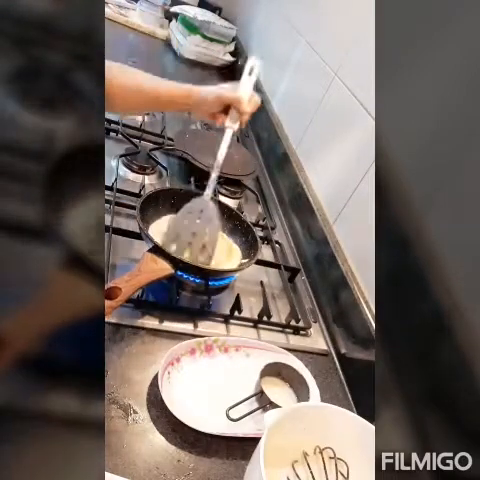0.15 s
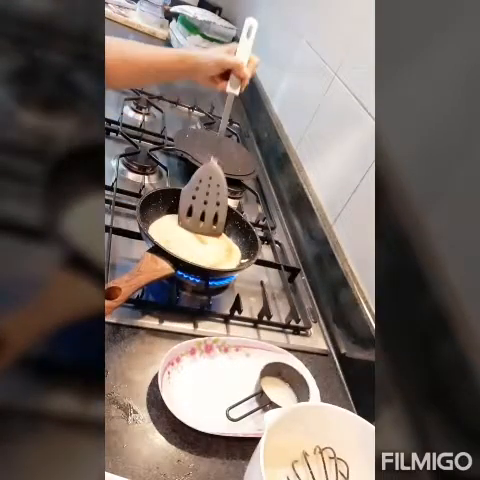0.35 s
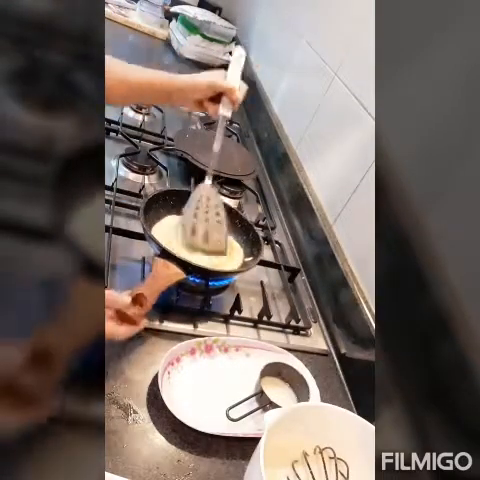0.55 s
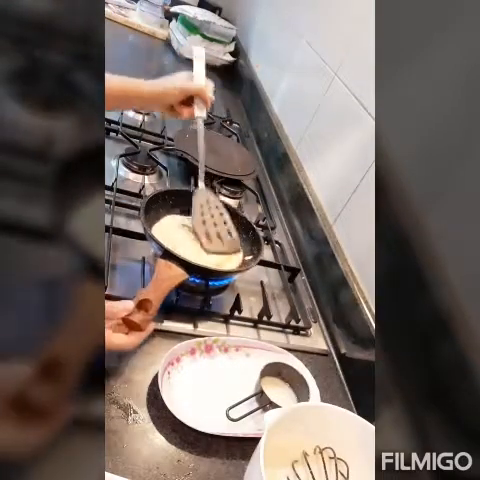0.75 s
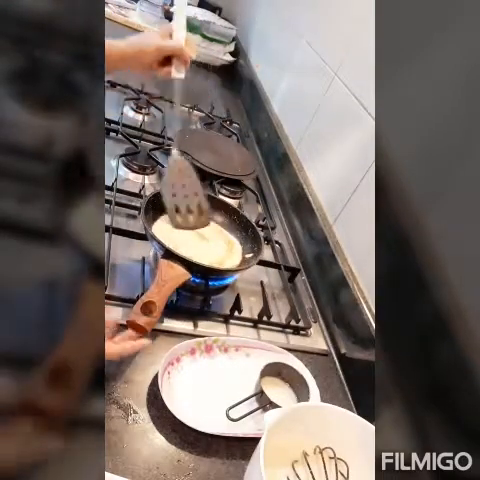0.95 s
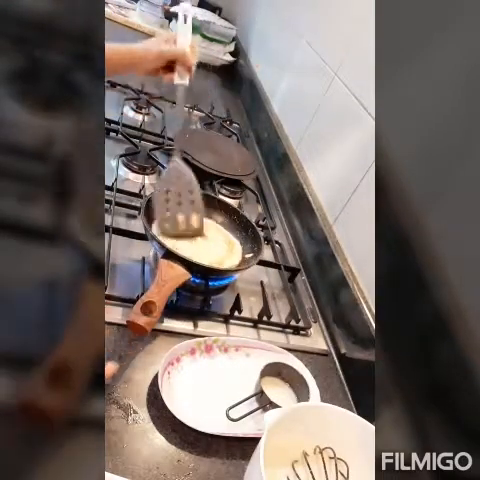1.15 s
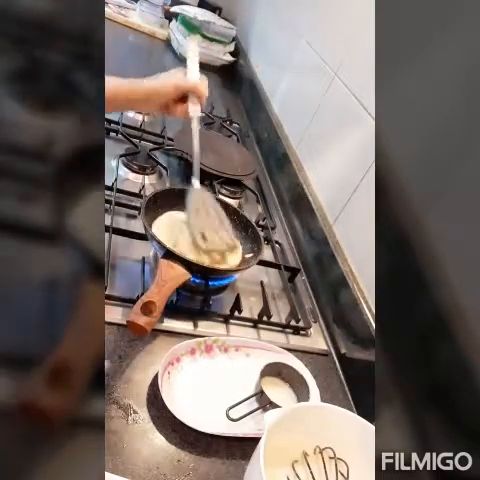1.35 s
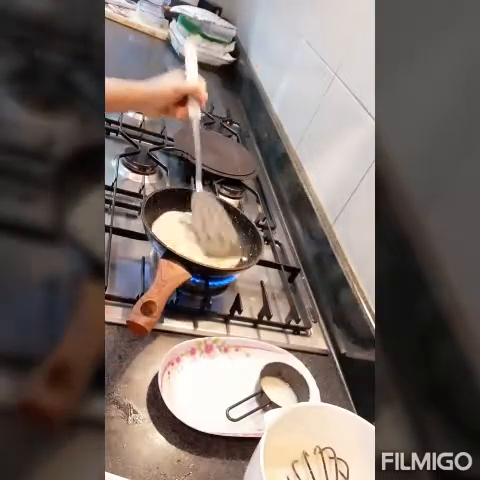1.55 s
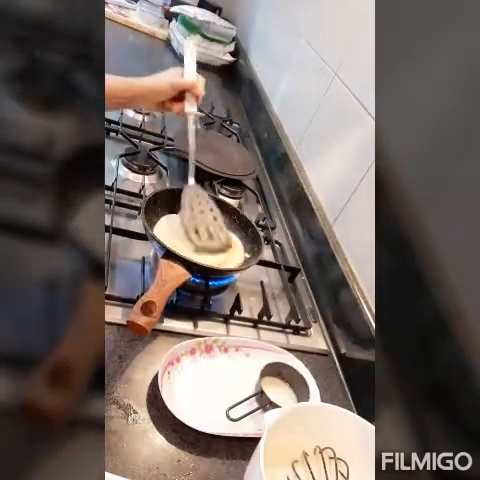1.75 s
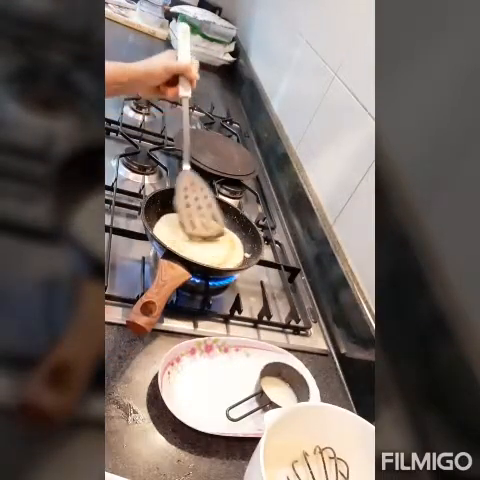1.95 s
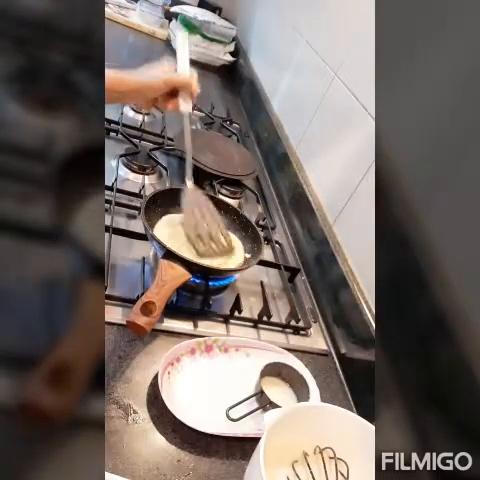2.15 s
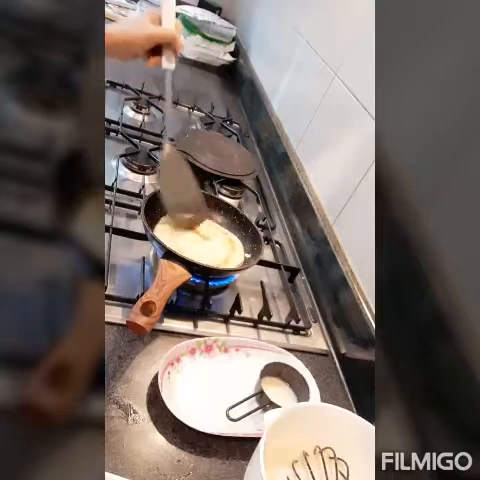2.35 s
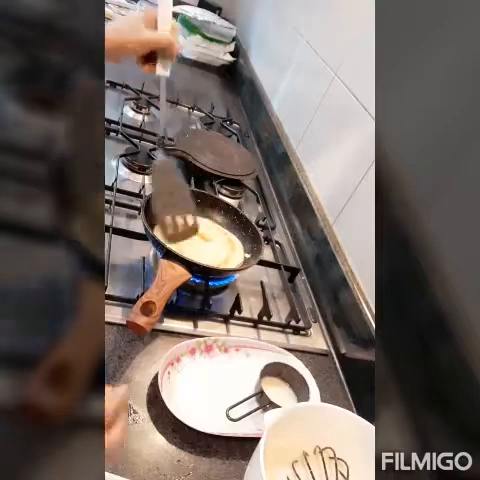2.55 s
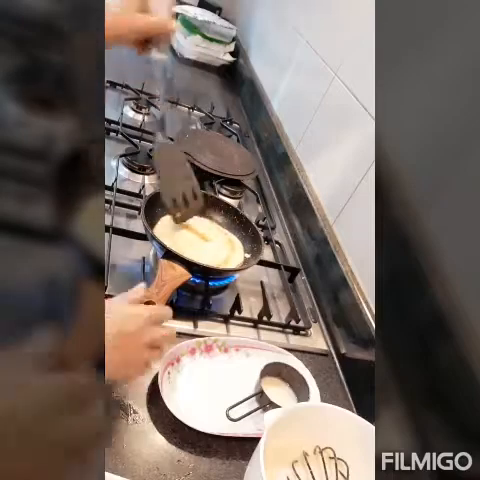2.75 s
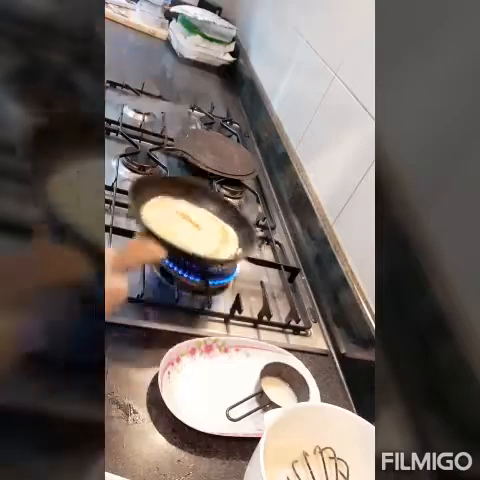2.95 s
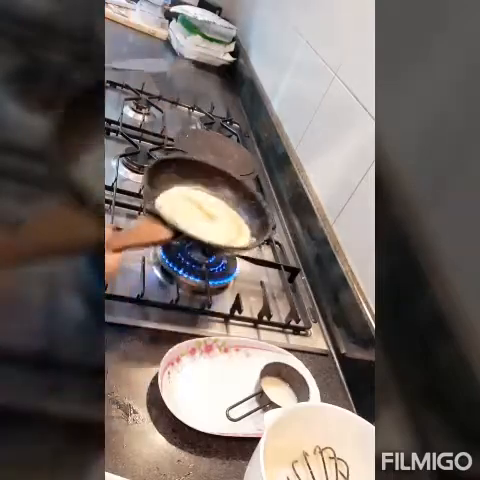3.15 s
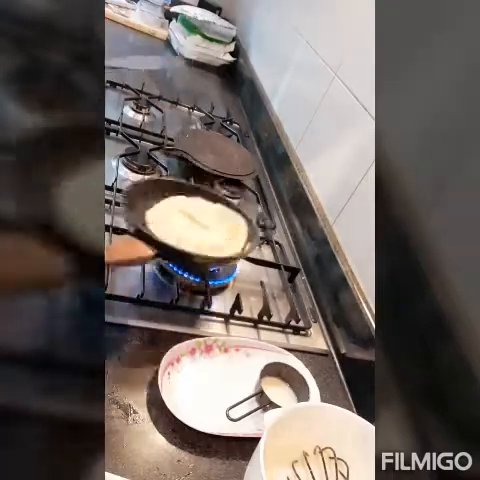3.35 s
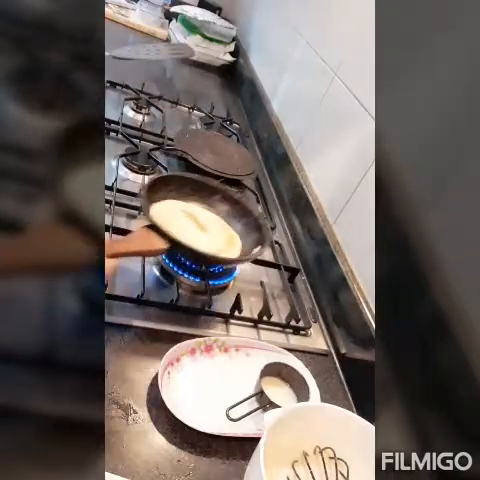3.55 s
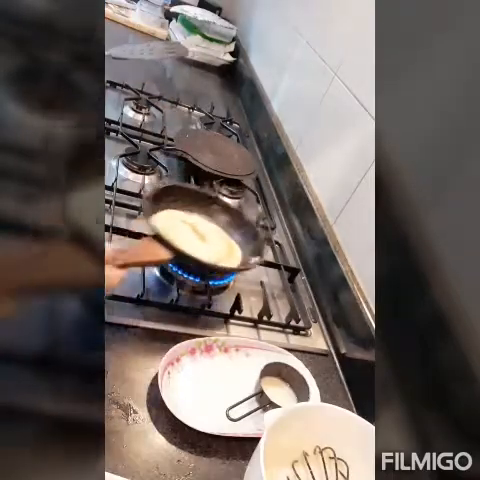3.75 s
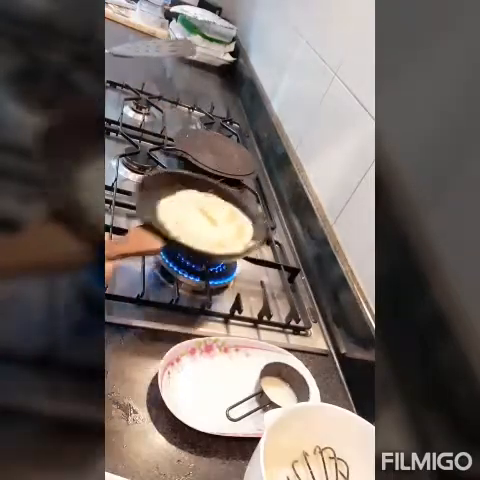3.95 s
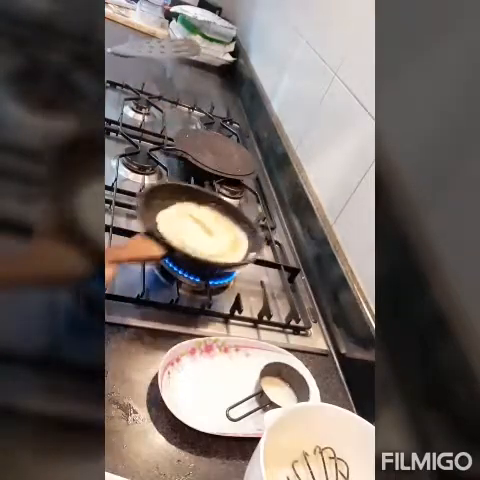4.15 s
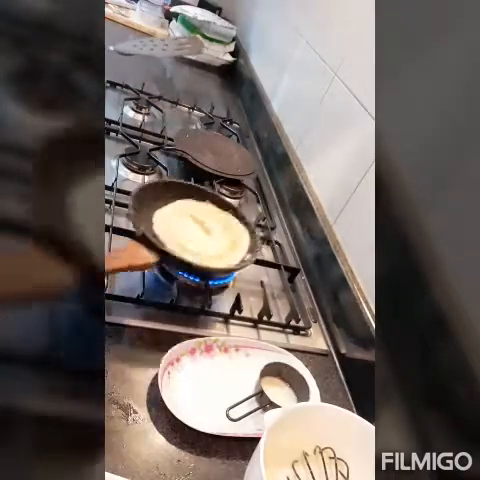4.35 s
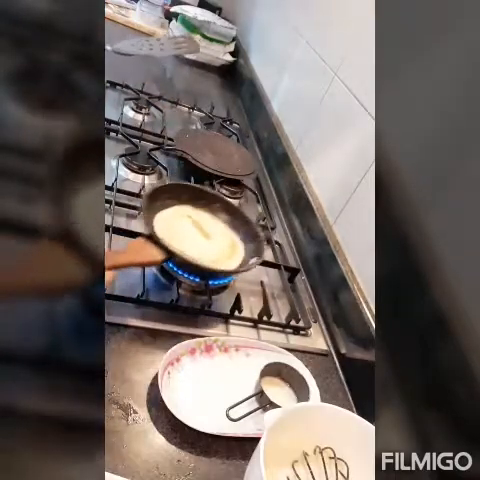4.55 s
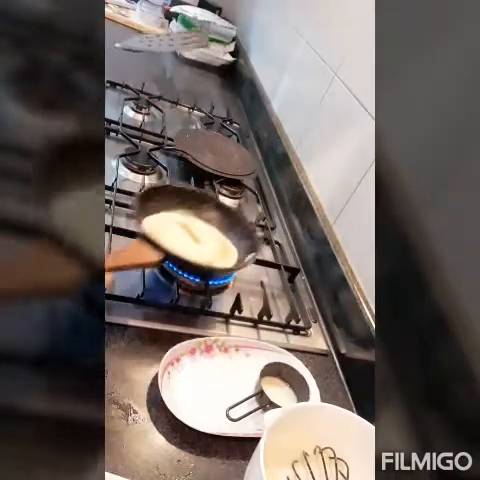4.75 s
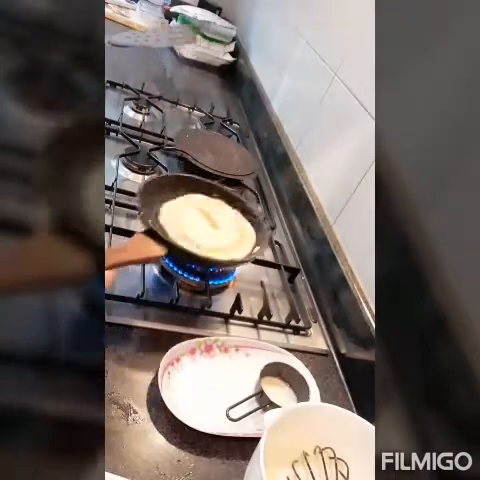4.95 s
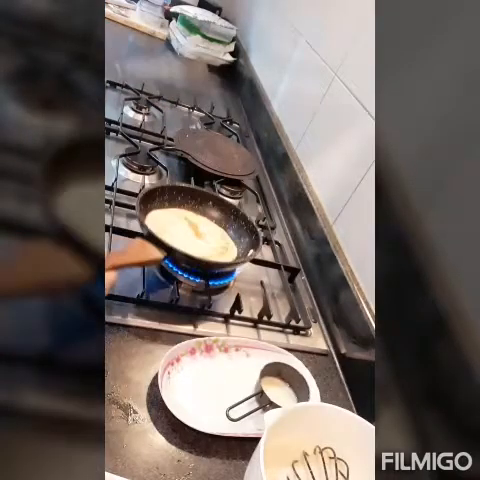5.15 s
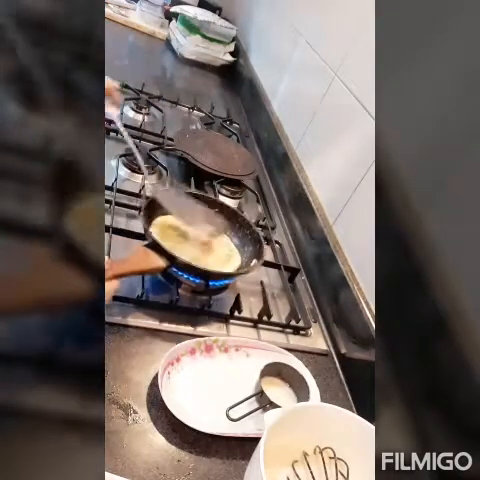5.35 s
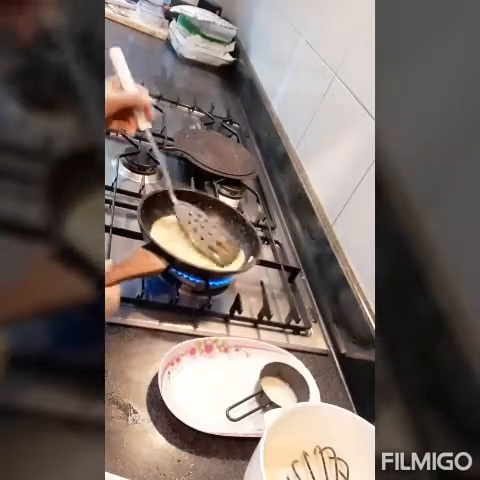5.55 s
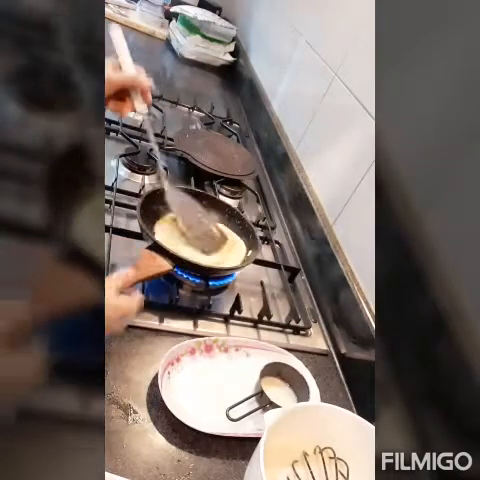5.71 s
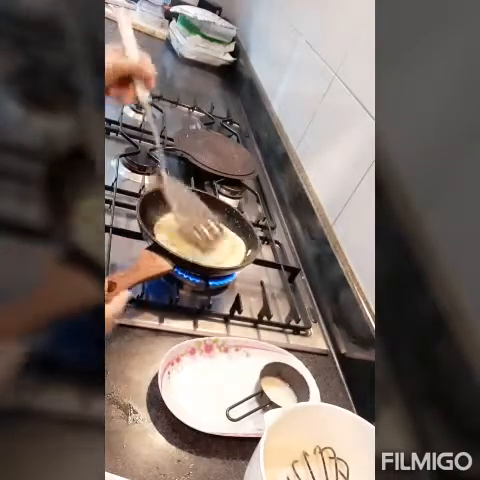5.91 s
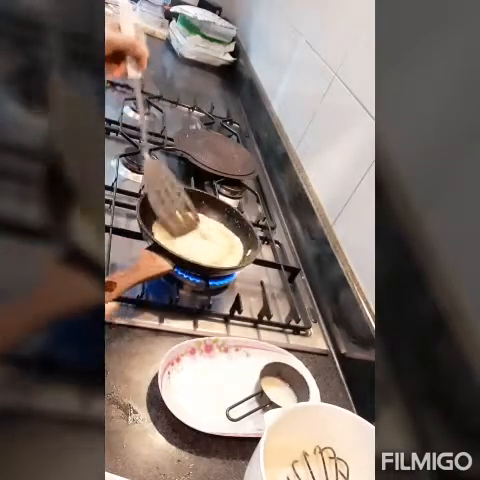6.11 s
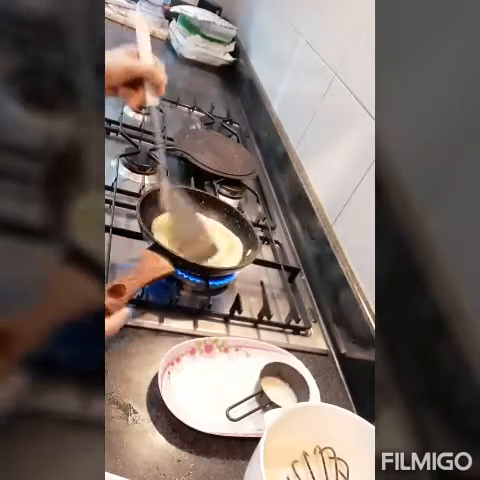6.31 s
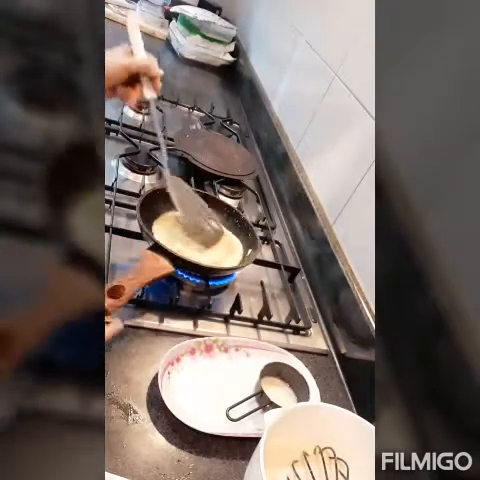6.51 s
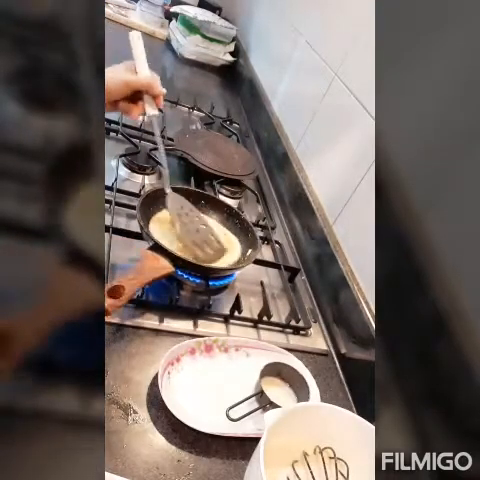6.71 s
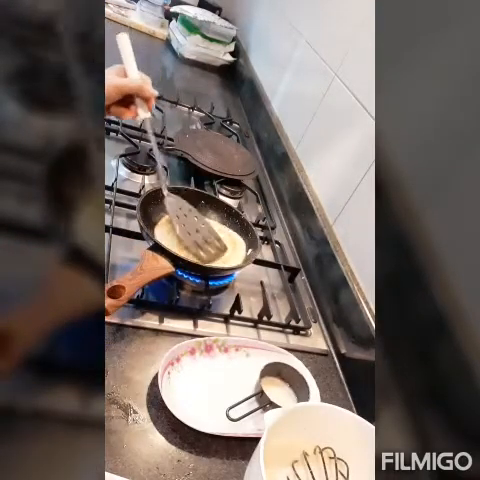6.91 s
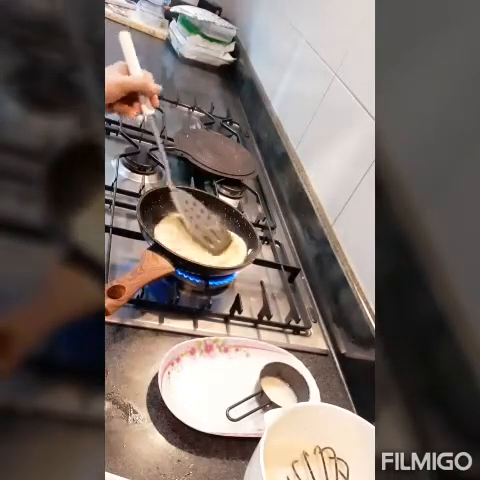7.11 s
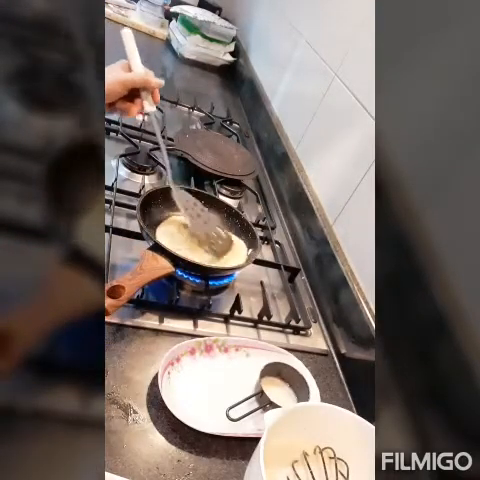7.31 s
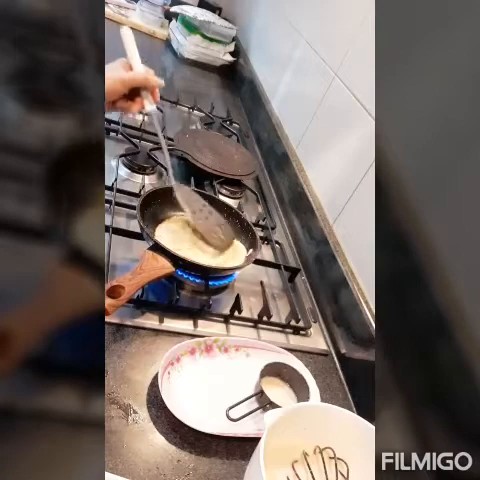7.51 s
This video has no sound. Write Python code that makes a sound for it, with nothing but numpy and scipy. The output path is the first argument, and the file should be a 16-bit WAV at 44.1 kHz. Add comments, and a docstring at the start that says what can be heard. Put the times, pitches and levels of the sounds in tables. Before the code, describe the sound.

Pan knocks and spatula clatters come in sparse bursts above a low electrical hum, soft gas flame and quiet frying hiss in a small kitchen.

```python
"""Pan and spatula, in short damped modes and noise bursts: a pan knocks and slides on an iron gas-hob
grate, and a spatula strikes, taps and scrapes, by random stick-slip, under a frying pancake.
Metal pings, bright clicks and a slowing judder join in. A small tiled kitchen adds one echo and a tail.
Behind: a sizzle of filtered noise and bubble pops, a fluttering burner rumble and a sine hum."""
import sys
import numpy as np
from scipy import signal
from scipy.fft import rfft, irfft, next_fast_len
from scipy.io import wavfile
from scipy.ndimage import uniform_filter1d

SR = 44100
rng = np.random.default_rng(int(sys.argv[2]) if len(sys.argv) > 2 else 0)


def master(y):
    """Save y as 16-bit WAV."""
    cut = np.clip(np.atleast_2d(y).T, -1, 1)
    pcm = np.round(cut * 32767)  # scale
    wavfile.write(sys.argv[1], SR, pcm.astype(np.int16))


N = 333837
TIME = np.arange(N) / SR
RING_TIME = TIME[:SR // 2]

# Event levels are source levels, ahead of the mix in scene(); mode and spectrum levels are relative.
# Pan drops on the grate: start_s, grate_thud_db, pan_clang_db, hob_boom_db, shove_hz, shove_t60_s
KNOCKS = [(.290, -35.5, -50, -53, 353, 0.0065), (0.3984, -21.5, -28.5, -26, 394, 0.009),
          (.4365, -39, -46, -55, 306, 0.0081), (.4825, -40, -53, -52, 383, 0.005),
          (.648, -41, -72, -54, 424, 0.0074), (2.8483, -20, -25.5, -38, 390, 0.006),
          (2.8975, -37, -38, -37, 396, 0.0086), (2.9375, -37, -44, -50, 430, 0.017),
          (3.444, -43.5, -77, -54, 335, 0.027)]
# Spatula blade strikes the pan: start_s, grate_thud_db, pan_clang_db, hob_boom_db, shove_hz, shove_t60_s
STRIKES = [(.7140, -30, -30.5, -34, 363, 0.0055), (1.124, -50, -57, -51, 320, 0.021),
           (1.379, -48, -63, -54, 390, 0.0041), (1.911, -33, -46.5, -64, 386, 0.0093),
           (2.015, -44, -55, -65, 386, 0.0093), (2.115, -42.5, -54, -55, 390, 0.0068),
           (5.2127, -35.5, -47, -31, 414, 0.011), (5.3368, -27.5, -25, -23.5, 345, 0.02),
           (6.472, -55, -46, -36, 390, .0075), (7.518, -39.5, -61, -44, 368, 0.012)]
# Blade tip clicks on the pan: start_s, tick_db, clang_db
TAPS = [(0.2407, -42, -42), (0.2802, -48, -43), (0.3118, -49, -43.5), (0.375, -51, -51), (0.4192, -50, -36),
        (0.4742, -49, -45.5), (0.5074, -70, -43.5), (2.7993, -51, -43), (5.2671, -67, -38.5),
        (5.309, -58, -41.5), (5.6357, -54, -53), (6.445, -66, -52.5), (7.4662, -58, -56)]
# Very short bright clicks, some on top of other blows: start_s, level_db
CLICKS = [(0.4743, -41), (1.8712, -51.5), (2.109, -50), (2.848, -42), (4.4587, -49), (5.3375, -36),
          (5.636, -40.5), (5.754, -52), (7.334, -48.5)]
# Spatula works under the pancake: start_s, length_s, rasp_db, grit_db (re rasp)
STROKES = [(0.052, 0.083, -53.5, -3), (0.252, 0.099, -47.5, -11), (0.353, 0.069, -45, -6),
           (0.43, 0.066, -52, -4), (0.944, 0.065, -60, -18), (1.066, 0.084, -52, -6),
           (1.223, 0.065, -54, -15), (1.363, 0.039, -50.5, -16), (1.634, 0.04, -60.5, -8),
           (1.888, 0.048, -50, -9), (2.006, 0.049, -49.5, -13), (2.107, 0.1, -48, -6.5),
           (2.799, 0.039, -42, -14), (5.208, 0.039, -49.5, -23), (5.256, 0.064, -50, -19),
           (5.692, 0.046, -55, -25), (6.055, 0.083, -57.5, -11), (6.444, 0.081, -54.5, -11),
           (6.711, 0.084, -56, -8.5), (6.916, 0.063, -57, -11), (7.041, 0.27, -51.5, -9.5),
           (7.335, 0.091, -56, -18), (7.444, 0.14, -51.5, -11)]
# Pan slides on the grate: start_s, length_s, rumble_db, grit_db
SLIDES = [(0.242, 0.1, -38.5, -62), (0.407, 0.042, -34.5, -54), (2.863, 0.064, -40, -54),
          (2.944, 0.091, -39, -61), (5.518, 0.1, -44, -65)]
# Short single-mode metal pings, two belonging to one blow: start_s, level_db, pitch_hz, t60_s
PINGS = [(.4748, -48, 4800, .02), (5.3379, -28.5, 1902, 0.094), (5.3372, -41.5, 4570, 0.11)]
# Hiss flares as wet batter meets hot metal: start_s, length_s, rise_db
FLARES = [(-.06, 0.49, 4), (1.064, 0.28, 3.5), (2.314, 0.19, 5.5), (2.847, 0.29, 3.5), (3.276, 0.22, 6.5),
          (3.516, 1.55, 3), (5.543, 0.064, 15.5)]

# Modes of the pan on the iron grate: pitch_hz, level_db, t60_s
GRATE_MODES = [(181.6, 6.5, 0.088), (229.5, 14, 0.074), (297.7, -3, 0.31), (339, 1.5, 0.31), (473, 3, 0.19),
               (525.5, 0, 0.32)]
# Modes of the pan wall: pitch_hz, level_db, t60_s
PAN_MODES = [(781, 2.5, 0.16), (852, -7, 0.33), (1061, -3, 0.13), (1145, 8.5, 0.074), (1228, -0.5, 0.12),
             (1565, -5.5, 0.12), (1757, 11.5, 0.093), (1867, 12.5, 0.087), (2384, 1.5, 0.045),
             (2540, 7, 0.063), (2719, -9, 0.09)]
# Modes of the steel hob top: pitch_hz, level_db, t60_s
HOB_MODES = [(108.6, -5.5, 0.36), (130.2, 0.5, 0.24)]
# Modes of the blade, tip on the pan: pitch_hz, level_db, t60_s
BLADE_TIP_MODES = [(785, 6.5, 0.0086), (1065, 0.5, 0.019), (1610, 0.5, 0.026), (1914, 2.5, 0.022),
                   (2116, -1.5, 0.027), (2993, 3.5, 0.017), (3290, -8, 0.029), (3840, -20, 0.034)]
# Modes of the blade bent flat against the pancake: pitch_hz, level_db, t60_s
BLADE_FLAT_MODES = [(792, -2, 0.024), (1100, 5.5, 0.012), (1280, -4.5, 0.032), (1780, -9, 0.0095),
                    (2500, 0, 0.015), (2830, -4, 0.011), (3390, -4.5, 0.013)]

# Spectrum of the dense grate vibration: freq_hz, level_db
THUD_COLOUR = [(40, -35), (90, -39), (150, 10.5), (260, -6), (480, -13), (700, -10.5), (1500, -16),
               (4000, -68)]
# Spectrum of the dense pan-wall vibration: freq_hz, level_db
CLANG_COLOUR = [(200, 5), (700, -6.5), (1100, -4.5), (1400, -9.5), (1850, -4), (2700, -4), (3400, -4.5),
                (4300, -9.5), (6000, -15), (12000, -49)]
# Spectrum of contact ticks and grit: freq_hz, level_db
TICK_COLOUR = [(1000, -44), (4000, -9.5), (5100, -1.5), (6300, -4), (7000, -1), (8000, -1.5), (9000, 1.5),
               (10700, -5.5), (12200, -3.5), (16000, -32)]
# Spectrum of the bright clicks: freq_hz, level_db
CLICK_COLOUR = [(2000, -9), (7000, -3), (14500, 1), (16000, -5)]
# Spectrum of the pan shuddering on the grate: freq_hz, level_db
RUMBLE_COLOUR = [(50, -1.5), (100, 2.5), (140, 4.5), (190, -1), (260, -9), (360, -5), (520, -16.5),
                 (800, -31.5), (3000, -44)]
# Spectrum of the frying hiss: freq_hz, density_db_per_hz
SIZZLE_COLOUR = [(600, -16), (1800, 2), (2800, 0), (5000, 2.5), (6300, 2), (8000, 2.5), (9200, 6),
                 (10400, 1.5), (12300, 6), (14000, 3), (16000, -1.5)]
# Spectrum of the gas flame: freq_hz, density_db_per_hz
BURNER_COLOUR = [(20, -30), (50, -16.5), (75, -15), (100, 3.5), (130, -2.5), (160, -5.5), (205, -17.5),
                 (260, -12.5), (345, -8.5), (430, -16.5), (650, -23), (1200, -31.5), (3000, -52.5),
                 (8000, -71)]
# Stereo balance of pan and spatula: freq_hz, left_minus_right_db
PAN_BALANCE = [(100, -4.5), (400, -2.5), (1200, -2.5), (2400, -4.5), (4500, -3.5), (8000, -4.5), (15000, 3)]
# Stereo balance of the steady sounds: freq_hz, left_minus_right_db
STEADY_BALANCE = [(100, -4), (380, -2.5), (700, -4), (1300, -11.5), (2400, -10.5), (4400, -5), (8000, -5),
                  (13000, 1.5)]

# Harder clang: louder tick
HARD_CLANG_DB, HARD_TICK_DB, TICK_DB_PER_DB = -24.5, -33, 2
# Pan rocks or springy blade rebounds; step per landing, gaps grow by the ratio
REBOUNDS_ABOVE_CLANG_DB, REBOUND_GAP_RATIO = -37, 1.4
REBOUND_THUD_DB, REBOUND_BOOM_DB, REBOUND_DULLING_DB = -6, -21, -3.5
TAP_THUD_RE_CLANG_DB, TAP_BOOM_RE_CLANG_DB = -4.5, -7.5
FLAT_FROM_S, FLAT_TO_S = 1, 2.6  # strokes starting between these use the flat blade
PUSH_S, PUSH_SHARE = 0.092, 0.91  # approx. push length in a to-and-fro stroke; moving share of each
STROKE_RUMBLE_RE_RASP_DB = 8.5
DETUNE = 0.013  # relative mode spread from contact to contact, as the load shifts
JUDDER_AT_S, JUDDER_S, JUDDER_HZ, JUDDER_SAG_HZ, JUDDER_DB = 5.213, 0.2, 121.5, 30.5, -31
HISS_DB, DRYING_DB_PER_S = -60.5, -0.35
FLARE_ATTACK_S, FLARE_RELEASE_S = 0.095, 0.071
HUM_HZ, HUM_DB = 99.43, -42.5  # level before stereo balance
TOP_HZ = 15850


def knocks():
    """Pan lands on one grate arm and rocks quickly onto the others."""
    return bouncing(KNOCKS, gap_s=0.0098, loss_db=-11.0, blade_db=-7, wall_db=-9, count=3)


def strikes():
    """Blade rings with the pan wall and springs back more slowly than the pan rocks."""
    return bouncing(STRIKES, gap_s=0.027, loss_db=-15.5, blade_db=-7, wall_db=-4.5, count=3)


def bouncing(blows, gap_s, loss_db, blade_db, wall_db, count):
    """Table of blows; a hard one lands count times, each weaker and duller, at lengthening gaps."""
    out = np.zeros((2, N))
    for start_s, thud_db, clang_db, boom_db, shove_hz, shove_t60_s in blows:
        landings = count if clang_db > REBOUNDS_ABOVE_CLANG_DB else 1
        first_tick_db = HARD_TICK_DB + TICK_DB_PER_DB * (clang_db - HARD_CLANG_DB)
        for k in range(landings):
            landing = blow(
                thud_db + k * REBOUND_THUD_DB,
                clang_db + k * loss_db,
                first_tick_db + k * (loss_db + REBOUND_DULLING_DB),
                boom_db + k * REBOUND_BOOM_DB,
                blade_db, shove_hz, shove_t60_s, pan_db=wall_db)
            add(out, start_s, landing)
            start_s += gap_s * REBOUND_GAP_RATIO ** k
    return out


def blow(thud_db, clang_db, tick_db, boom_db, blade_db, push_hz=390, push_t60_s=0.0041, push_db=-2.0,
         grate_db=-6, clatter_db=-8, pan_db=-8, crack_db=-2, chatter_db=-10):
    """Blow shoves the pan on the grate, rings wall and blade, ticks at contact and booms the hob top."""
    # little tick = soft blow: longer contact, more ring, less crack
    softness = np.clip(undb(clang_db - tick_db) / 2, 1, 10)
    touch_s = 0.00014 * softness

    push = np.sin(2 * np.pi * push_hz * RING_TIME) * RING_TIME ** 2 * fade(push_t60_s)
    thud = undb(push_db) * unit(push, size=441)
    thud = thud + undb(grate_db) * ring(GRATE_MODES, touch_s)
    thud = thud + undb(clatter_db) * burst(THUD_COLOUR, t60_s=0.15, contact_s=0.0016)

    clang = undb(pan_db) * ring(PAN_MODES, touch_s) + undb(blade_db) * ring(BLADE_TIP_MODES, touch_s)
    crack = burst(CLANG_COLOUR, t60_s=0.087, contact_s=touch_s)
    clang = clang + undb(crack_db) / np.sqrt(softness) * crack

    # sharp tick, then brief chatter of the hard surfaces
    tick = burst(TICK_COLOUR, t60_s=0.048, contact_s=0.0011)
    tick = tick + undb(chatter_db) * burst(TICK_COLOUR, t60_s=0.04, contact_s=0.0022)
    boom = ring(HOB_MODES, touch_s)
    return undb(thud_db) * thud + undb(clang_db) * clang + undb(tick_db) * tick + undb(boom_db) * boom


def taps(blade_db=-5):
    """Light, sharp blows of the blade tip that barely move the pan."""
    out = np.zeros((2, N))
    for start_s, tick_db, clang_db in TAPS:
        thud_db, boom_db = clang_db + TAP_THUD_RE_CLANG_DB, clang_db + TAP_BOOM_RE_CLANG_DB
        add(out, start_s, blow(thud_db, clang_db, tick_db, boom_db, blade_db, chatter_db=-11))
    return out


def clicks():
    """Very short bright clicks, as treble noise bursts, some on top of knocks, strikes and taps."""
    out = np.zeros((2, N))
    for start_s, level_db in CLICKS:
        add(out, start_s, undb(level_db) * burst(CLICK_COLOUR, t60_s=0.042, contact_s=0.0005))
    return out


def scrapes(pan_db=-18, crack_db=-5.0):
    """Blade scrapes to and fro over the pan in short stick-slip pushes."""
    out = np.zeros((2, N))
    for start_s, length_s, rasp_db, grit_re_rasp_db in STROKES:
        blade_modes = BLADE_FLAT_MODES if FLAT_FROM_S < start_s < FLAT_TO_S else BLADE_TIP_MODES
        pushes = max(1, round(length_s / PUSH_S))
        period_s = length_s / pushes
        for k in range(pushes):
            body = ring(blade_modes, scatter_db=1.5) + undb(pan_db) * ring(PAN_MODES)
            body = body + undb(crack_db) * burst(CLANG_COLOUR, t60_s=0.022, contact_s=0.000094)
            push = rub(PUSH_SHARE * period_s, body, rasp_db, rasp_db + grit_re_rasp_db,
                       rasp_db + STROKE_RUMBLE_RE_RASP_DB, crest=0.37)
            add(out, start_s + k * period_s, push)
    return out


def slides(rasp_db=-9, wall_db=-9):
    """Pan base grinds over the iron grate: mostly rumble, some clatter and wall ring."""
    out = np.zeros((2, N))
    for start_s, length_s, rumble_db, grit_db in SLIDES:
        base = burst(THUD_COLOUR, t60_s=0.037, contact_s=0.000071)
        base = base + undb(wall_db) * burst(CLANG_COLOUR, t60_s=0.0069, contact_s=0.00014)
        add(out, start_s, rub(length_s, base, rumble_db + rasp_db, grit_db, rumble_db, crest=0.33))
    return out


def rub(length_s, body, rasp_db, grit_db, rumble_db, crest, slips_per_s=2000, spread_db=1.4,
        judder_db=3.0, judder_per_s=130):
    """Stick-slip: each slip is a tiny blow on the body; pressure rises, then falls from crest."""
    size = len(RING_TIME)
    peak_s = length_s * np.clip(crest, 0.1, 0.9)
    pressure = np.sqrt(np.interp(RING_TIME, [0, peak_s, length_s], [0, 1, 0]))
    pressure = pressure * undb(judder_db * walk(judder_per_s)[:size])  # springy contact
    sizes = undb(spread_db * np.minimum(rng.exponential(size=size), 4))
    slips = pressure * sizes * (rng.random(size) < slips_per_s / SR)
    force = slips * rng.choice([-1, 1], (2, size))  # random sign per channel widens the scrape
    rasp = signal.fftconvolve(force, body, axes=1)[:, :size]
    grit = colour(force, TICK_COLOUR)
    rumble = colour(noise(size), RUMBLE_COLOUR) * pressure  # pan shudders on the grate
    mix = undb(rasp_db) * unit(rasp) + undb(grit_db) * unit(grit) + undb(rumble_db) * unit(rumble)
    return mix * np.sqrt(np.mean(pressure ** 2))


def pings():
    """Short metal pings, each a single damped mode."""
    out = np.zeros((2, N))
    for start_s, level_db, pitch_hz, t60_s in PINGS:
        add(out, start_s, undb(level_db) * ring([(pitch_hz, 0, t60_s)]))
    return out


def judder(grind_db=-11, attack_s=0.005, release_s=0.026):
    """Dragged pan sticks and slips, slows by a quarter and fades; slips shake the hob, grind the iron."""
    slip_hz = JUDDER_HZ - JUDDER_SAG_HZ * np.minimum(RING_TIME / JUDDER_S, 1) ** 2
    cycles = np.cumsum(slip_hz) / SR
    drag = np.clip(np.minimum(RING_TIME / attack_s, (JUDDER_S - RING_TIME) / release_s), 0, 1)
    shake = np.sqrt(2) * np.sin(2 * np.pi * cycles)
    grind = noise(len(RING_TIME)) * np.exp(-2 * (cycles % 1))  # restarts on every slip
    grind = unit(colour(grind, [(200, -2.5), (380, 1), (850, -4), (6000, -60)]))
    out = np.zeros((2, N))
    add(out, JUDDER_AT_S, undb(JUDDER_DB) * drag * (shake + undb(grind_db) * grind))
    return out


def ring(modes, contact_s=0.00042, scatter_db=2, apart_hz=1000):
    """Damped modes; contact point varies level and tuning, high modes reach the sides out of phase."""
    out = 0
    draws = rng.standard_normal((len(modes), 4))
    for (pitch_hz, level_db, t60_s), (size, turn, start, shift) in zip(modes, draws):
        phase = pitch_hz / apart_hz * (turn * np.array([[1], [-1]]) + start)
        tuned_hz = pitch_hz * (1 + DETUNE * shift)
        tone = np.sin(2 * np.pi * tuned_hz * RING_TIME + phase)
        out = out + undb(level_db + scatter_db * size) * fade(t60_s) * tone
    return unit(out * contact(contact_s), size=441)


def burst(points, t60_s, contact_s):
    """Many crowded modes dying together, as decaying coloured noise."""
    return unit(colour(noise(len(RING_TIME)), points) * fade(t60_s) * contact(contact_s), size=441)


def contact(contact_s):
    """Smooth onset ramp; a longer contact starts more gently."""
    return 1 - np.exp(-(RING_TIME / contact_s) ** 2)


def kitchen(x, wall_s=0.0093, wall_db=-14, room_db=-7, low_t60_s=0.39, high_t60_s=0.25):
    """Tiled wall returns one early echo; the room then rings, longest in the bass."""
    tail = noise(len(RING_TIME))
    low = signal.sosfilt(signal.butter(1, 2500, fs=SR, output="sos"), tail)
    response = low * fade(low_t60_s) + undb(5.5) * (tail - low) * fade(high_t60_s)
    response = response * (1 - np.exp(-RING_TIME / 0.0067))  # tail builds up
    response *= undb(room_db) / np.sqrt(np.sum(fade(low_t60_s) ** 2))
    response[:, 0] += 1  # direct sound
    response[:, int(wall_s * SR)] += undb(wall_db)
    return signal.fftconvolve(x, response, axes=1)[:, :N]


def sizzle(pops_per_s=900, pop_db=-7, spread_db=-0.5, flicker_db=1.57):
    """Steam escapes from under the batter: fine, flickering hiss with tiny bursting bubbles."""
    sizes = undb(spread_db * np.minimum(rng.exponential(size=N), 4))
    pops = unit(rng.standard_normal((2, N)) * sizes * (rng.random(N) < pops_per_s / SR))
    hiss = unit(colour(noise(N) + undb(pop_db) * pops, SIZZLE_COLOUR))
    low = colour(hiss, [(4500, 0), (9000, -25)])
    hiss = hiss + low * (undb(walk(25)) - 1)  # low part wavers on its own
    return hiss * undb(frying_db() + flicker_db * walk(40))


def frying_db():
    """Hiss level: slow decline as the batter dries, plus rise, hold and release per flare."""
    level_db = HISS_DB + DRYING_DB_PER_S * TIME
    for start_s, length_s, rise_db in FLARES:
        attack = (TIME - start_s) / FLARE_ATTACK_S
        release = 1 + (start_s + length_s - TIME) / FLARE_RELEASE_S
        level_db = level_db + rise_db * np.clip(np.minimum(attack, release), 0, 1)
    return level_db


def burner(level_db=-49.0, flutter_db=1.0):
    """Gas flame: soft, fluttering rumble of coloured noise."""
    return undb(level_db + flutter_db * walk(14)) * unit(colour(noise(N), BURNER_COLOUR))


def hum():
    """Electric appliance hums steadily at twice the mains frequency."""
    return undb(HUM_DB) * np.sqrt(2) * np.sin(2 * np.pi * HUM_HZ * TIME)


def undb(db):
    """Decibels to gain."""
    return 10 ** (np.asarray(db) / 20)


def unit(x, size=None):
    """Scale to rms 1 over the first size samples."""
    return x / np.sqrt(np.mean(x[..., :size] ** 2))


def fade(t60_s):
    """Exponential decay, 60 dB down after t60_s."""
    return np.exp(-np.log(1000) * RING_TIME / t60_s)


def colour(x, points, power=1):
    """Filter by (freq_hz, level_db) points joined on a log-frequency axis; power scales the dB."""
    freq_hz, level_db = np.transpose(points)
    n = next_fast_len(x.shape[-1])
    bin_hz = np.maximum(np.fft.rfftfreq(n, 1 / SR), 1)
    gain = undb(np.interp(np.log(bin_hz), np.log(freq_hz), level_db)) ** power
    return irfft(rfft(x, n) * gain, n)[..., :x.shape[-1]]


def noise(size, alike_hz=680):
    """White noise in two channels: long waves reach both alike, short ones do not."""
    alike = 1 / (1 + (np.fft.rfftfreq(size, 1 / SR) / alike_hz) ** 2)
    gains = np.sqrt([(1 + alike) / 2, (1 - alike) / 2])
    mid, side = rfft(rng.standard_normal((2, size))) * gains
    return irfft(np.array([mid + side, mid - side]), size)


def walk(rate_hz):
    """Random levels held 1 / rate_hz and slewed; rms 1."""
    k = int(SR / rate_hz)
    steps = np.repeat(rng.standard_normal(N // k + 1), k)
    return unit(uniform_filter1d(steps, k)[:N])


def add(track, start_s, sound):
    """Mix a sound in at start_s."""
    i = int(start_s * SR)
    track[:, i:i + sound.shape[1]] += sound[:, :N - i]


def place(x, balance):
    """Share a sound between left and right, frequency by frequency."""
    return np.array([colour(x[0], balance, 1 / 2), colour(x[1], balance, -1 / 2)])


def scene(low_cut_hz=80):
    """Pan and spatula in the room, over frying, flame and hum; pings and judder bypass the room."""
    blows = undb(-1.5) * (knocks() + strikes() + taps() + clicks())
    handling = kitchen(blows + scrapes() + slides()) + pings() + judder()
    # high-pass: the handling keeps almost no deep bass
    handling = signal.sosfilt(signal.butter(2, low_cut_hz, "high", fs=SR, output="sos"), handling)
    steady = sizzle() + burner() + hum()
    return place(handling, PAN_BALANCE) + place(steady, STEADY_BALANCE)


def record(dry):
    """Steep low-pass at TOP_HZ."""
    return signal.sosfilt(signal.ellip(10, 0.2, 80, TOP_HZ, fs=SR, output="sos"), dry)


dry = scene()
out = record(dry)
master(out)
```